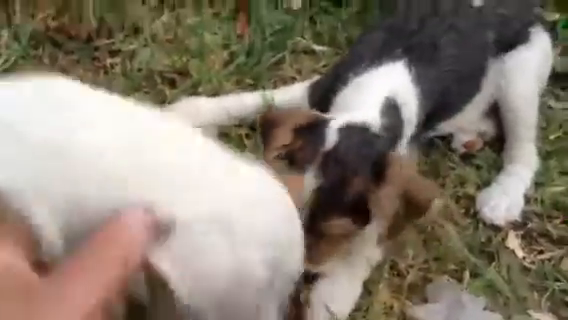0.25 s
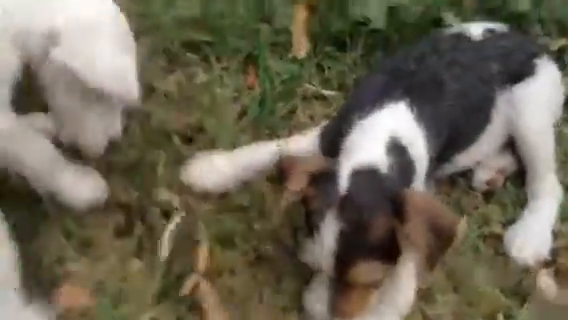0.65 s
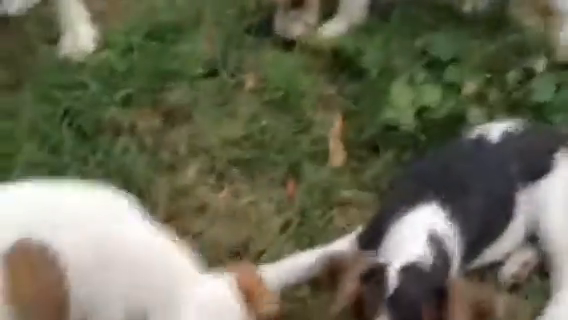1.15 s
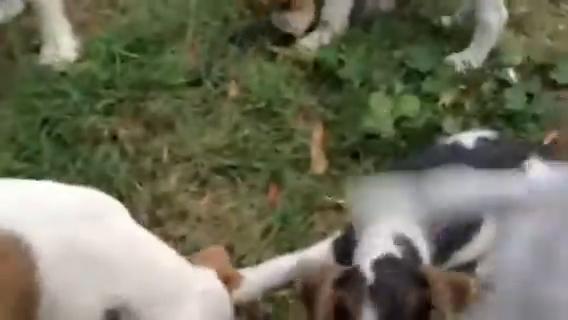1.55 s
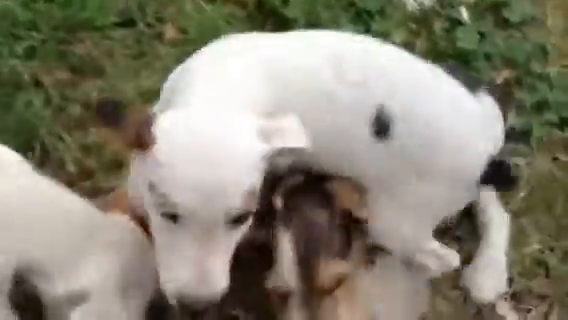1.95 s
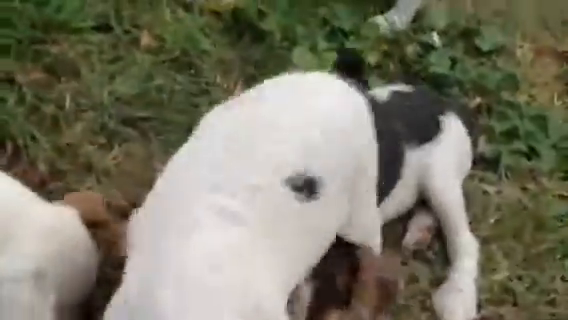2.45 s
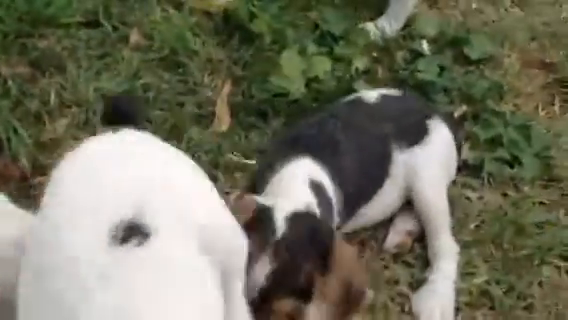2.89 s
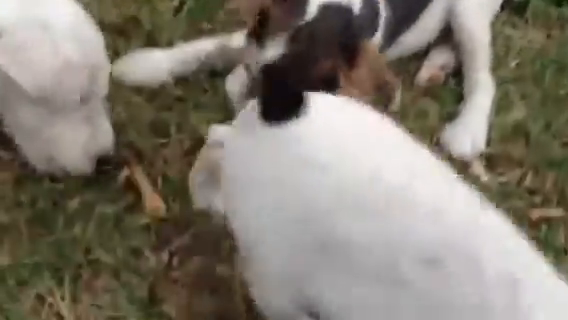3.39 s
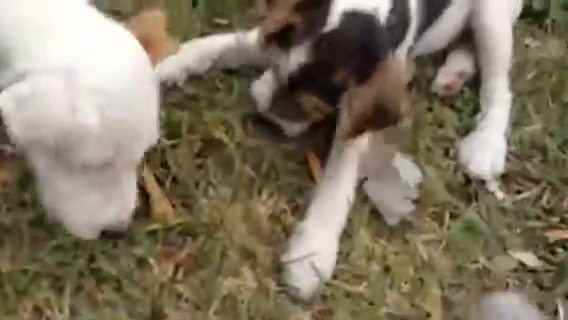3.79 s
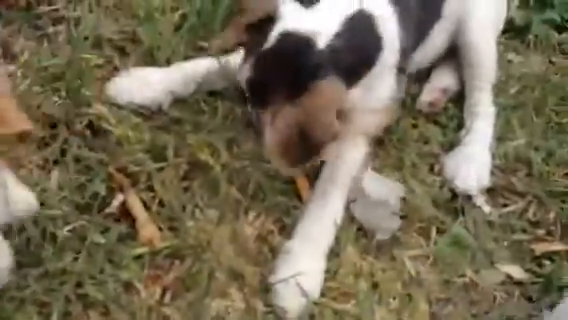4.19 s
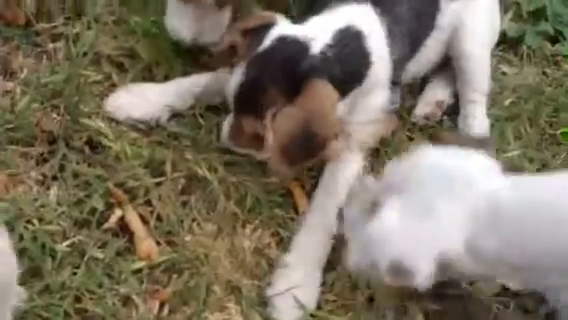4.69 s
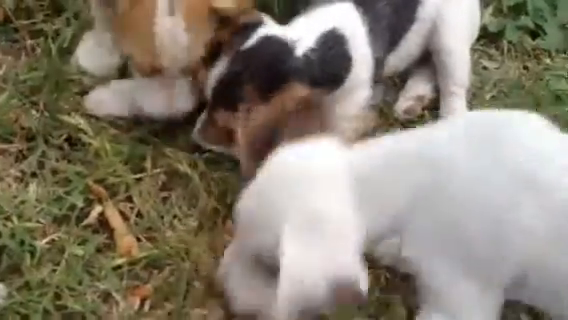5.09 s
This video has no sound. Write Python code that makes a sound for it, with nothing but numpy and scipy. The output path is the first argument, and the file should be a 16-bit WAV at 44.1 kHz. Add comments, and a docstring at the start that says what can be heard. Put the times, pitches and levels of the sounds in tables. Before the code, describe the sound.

In a quiet garden, puppies stir the grass close by, making light crackles, short sniffs and wet mouth smacks. A loud, brittle snap cuts in after about a second, and the other sounds duck and swell back. Scattered clicks of dry stalks and chewing follow, then a brief, faint whine. Thin bird chirps and a low, distant hum stay far behind.

```python
"""Puppies on a lawn

Puppies chew, snuffle, smack and whimper close by, while the grass under them rustles in countless
tiny impacts. Something hard scrapes under strain and snaps in a quick run of cracks, which drives the
gain control down, so that everything ducks and swells back. Small birds whistle in the garden over a
soft wash of noise, a low hum and the firing tone of a far-off engine."""
import sys
import numpy as np
from scipy import signal
from scipy.fft import rfft, irfft
from scipy.io import wavfile
from scipy.ndimage import uniform_filter1d, minimum_filter1d

SR = 44100
rng = np.random.default_rng(int(sys.argv[2]) if len(sys.argv) > 2 else 0)


def persist_wave(psi):
    """Save psi, clipped to +-1, as 16-bit WAV."""
    counts = np.round(np.clip(psi, -1, 1) * 32767).astype(np.int16)
    wavfile.write(sys.argv[1], SR, np.atleast_2d(counts).T)


N = 235690
T = np.arange(N) / SR

# how much the puppies stir the grass: (time [s], relative level [dB])
GRASS_STIR = [(0, -59.5), (.58, -53), (.85, -60.5), (1.75, -56.5), (2.25, -64.5), (2.98, -68), (3.28, -57),
              (3.6, -61), (3.88, -57), (4.96, -60), (5.11, -64), (5.19, -56), (5.34, -62.5)]
# spectrum of blades in contact: (frequency [Hz], level [dB])
GRASS_SPECTRUM = [(500, -27), (1000, -4.5), (1600, -6), (2200, -5), (4000, -1.5), (5600, -3), (7500, -0.5),
                  (11600, -1), (14500, -1), (15500, -7)]
# the snap, crack by crack: (time [s], peak [dB], splinter decay time [s], body re crack [dB])
SNAP_CRACKS = [(0.9426, -13.5, 0.00046, -2), (0.9762, -7.5, 0.0016, -15), (0.9828, -4, 0.00085, -7.5),
               (0.99, 9.5, 0.0004, -17), (0.9933, 0, .0007, -4.5), (1.0031, 6, 0.00077, -9),
               (1.0114, 1, 0.0016, 11), (1.016, 8.5, 0.0015, 0), (1.018, 8, 0.0004, -0.5)]
# spectrum of the breaking material: (frequency [Hz], level [dB])
SNAP_SPECTRUM = [(240, -46), (400, -16.5), (821, -10), (900, -16), (1240, -7), (2090, -12.5), (2320, -6),
                 (3570, -6.5), (4920, -3), (6280, -2), (8280, 0.5), (13500, -6), (15500, -10)]


def undb(db):
    """Amplitude ratio of a level in decibels."""
    return 10 ** (np.asarray(db) / 20)


def unit(x):
    """Normalisation to rms 1."""
    return x / np.sqrt(np.mean(x ** 2))


def curves(rows):
    """Linear interpolation of each column of a table over time."""
    times, *columns = np.transpose(rows)
    return [np.interp(T, times, column) for column in columns]


def drift(rate):
    """Random modulation: `rate` Gaussian values a second, joined by lines; spread near 1."""
    knots = np.arange(int(N / SR * rate) + 2) / rate
    return 1.2 * np.interp(T, knots, rng.standard_normal(len(knots)))


def swell(middle, length):
    """Super-Gaussian envelope: a flat-topped rise and fall around a moment."""
    return np.exp(-np.minimum(np.abs(2 * (T - middle) / length) ** 4, 50))


def phase(hz):
    """Phase in radians is the time integral of angular frequency."""
    return 2 * np.pi * np.cumsum(hz) / SR


def response(spectrum, size=2048):
    """Minimum-phase impulse response of unit energy, from the folded cepstrum of a spectrum."""
    hz, db = np.transpose(spectrum)
    bin_hz = np.arange(size // 2 + 1) * SR / size
    gain = undb(np.interp(np.log(bin_hz + 1), np.log(hz), db))
    cepstrum = irfft(np.log(gain))
    cepstrum[1:size // 2] *= 2
    cepstrum[size // 2 + 1:] = 0
    h = irfft(np.exp(rfft(cepstrum)))
    return h / np.sqrt(np.sum(h ** 2))


def through(x, h):
    """Linear filtering: convolution with the impulse response h."""
    return signal.fftconvolve(x, h)[:N]


def resonate(x, hz, width_hz):
    """Second-order resonance, gain 1 at its centre."""
    return signal.lfilter(*signal.iirpeak(hz, hz / width_hz, fs=SR), x)


def ring(hz, t60):
    """Free vibration of a damped mode, falling 60 dB in t60 seconds."""
    t = T[:SR // 4]
    return np.cos(2 * np.pi * hz * t) * np.exp(-np.log(1000) * t / t60)


def add(out, s, sound):
    """Superposition of a sound that starts at s seconds."""
    start = int(s * SR)
    out[start:start + len(sound)] += sound[:N - start]


def with_delayed_copy(x, delay_s, db):
    """Comb filtering: a sound plus a delayed, weaker copy of itself."""
    return x + undb(db) * np.interp(T - delay_s, T, x, left=0)


def grains(rate, spread_db):
    """Shot noise: `rate` random impacts a second, most small and a few large; rms 1."""
    sizes = undb(spread_db * np.minimum(rng.exponential(size=N), 5))
    return unit((rng.random(N) < rate / SR) * sizes * rng.choice([-1, 1], N))


def fracture(h, decay_s, splinter):
    """Brittle fracture: an impulse and a decaying spray of splinters excite the response h; peak 1."""
    force = splinter * rng.standard_normal(len(h)) * np.exp(-T[:len(h)] / decay_s)
    force[0] = 1
    crack = signal.fftconvolve(force, h)
    return crack / np.abs(crack).max()


def garden(hum_hz=120):
    """Ambient noise: a far-off broadband wash and a low hum, each gently amplitude-modulated."""
    # course of the background: (time [s], wash level [dB], hum level [dB])
    levels = [(0, -57, -63.5), (1.0, -57, -66), (1.8, -56, -79), (3.3, -58, -75.5), (3.8, -60, -78),
              (4.4, -58.5, -78), (5.34, -58, -79)]
    # spectrum of the wash: (frequency [Hz], level [dB])
    wash_spectrum = [(25, -20), (50, -15.5), (80, -7.5), (110, -4), (145, 3), (185, 2.5), (300, -3),
                     (450, -7.5), (750, -3), (1200, -3.5), (2000, -12), (2700, -19), (4500, -19),
                     (7000, -27.5), (15500, -29.5)]
    wash_db, hum_db = curves(levels)
    wash = through(rng.standard_normal(N), response(wash_spectrum, size=8192))
    hum = np.sqrt(2) * np.sin(phase(hum_hz + 0.58 * drift(11)))
    return undb(wash_db + 1.14 * drift(8)) * wash + undb(hum_db + 2.6 * drift(4.8)) * hum


def far_engine():
    """Periodic firing makes a tone; only its unsteady fundamental carries from a distant engine."""
    # the engine gathers speed, then eases off: (time [s], firing frequency [Hz], level [dB])
    firing = [(2.5, 95, -100), (3.1, 96, -78), (4.1, 102, -71), (4.65, 103.3, -70), (5.0, 85, -75),
              (5.34, 76, -76)]
    hz, db = curves(firing)
    amplitude = undb(db + 2.6 * drift(11)) * np.sqrt(2)
    return amplitude * np.sin(phase(hz + 1.24 * drift(9.1)))


def far_notes():
    """Short gliding bird notes, clear or burry with the depth of their fast frequency modulation."""
    # (middle [s], length [s], pitch [Hz], glide [Hz/s], level [dB], burr [share of pitch])
    notes = [(0.667, 0.098, 4150, -4000, -56.5, 0.12), (0.715, .025, 3425, -4, -54, 0.055),
             (2.727, 0.036, 3840, 9, -59, 0.087), (2.786, 0.05, 4270, -3000, -57, 0.15),
             (2.819, 0.037, 3440, 1498, -56.5, 0.028), (3.396, .015, 3320, 0, -62, 0.017),
             (4.531, 0.023, 3400, 2, -55.5, 0.11), (4.579, 0.044, 3560, -12000, -61, .08),
             (4.687, 0.027, 4400, 40000, -62, 0.047), (4.706, .022, 3730, -8000, -54.5, 0.056),
             (5.314, 0.025, 3810, -18000, -53.5, 0.03)]
    out, flutter = np.zeros(N), drift(900)
    for s, length, note_hz, glide, db, burr in notes:
        on = np.abs(T - s) < length
        hz = (note_hz + glide * (T[on] - s)) * (1 + burr * flutter[on])
        out[on] += undb(db) * swell(s, length)[on] * np.sin(phase(hz))
    return out


def chirps(rise_power=1.7, sag_s=0.052, fade_db_per_s=181, end_s=0.069):
    """Two-voice song: each side of the syrinx oscillates in a thin whistle that arches in pitch."""
    # the arches: (time of crest [s], level [dB], lead-in [s])
    arches = [(0.186, -53, 0.04), (1.062, -57.5, 0.05), (2.198, -56, .11), (4.04, -57, 0.049)]
    # the two whistles: (start [Hz], top [Hz], end [Hz], relative level [dB], rise [dB/s],
    # loudest after crest [s], burr [share of pitch])
    voices = [(3240, 4090, 3900, .5, 174, 0.0049, 0.0091), (2564, 3720, 3000, 2, 108, 0.022, .026)]
    out = np.zeros(N)
    for start_hz, top_hz, end_hz, voice_db, rise_db_per_s, loudest_s, burr in voices:
        waver = 1 + burr * drift(700)
        for crest_s, db, lead_s in arches:
            t = T - crest_s
            climb_left = np.clip(-t / lead_s, 0, 1) ** rise_power
            sag = 1 - np.exp(-np.clip(t / sag_s, 0, 2) ** 2)
            hz = (top_hz + (start_hz - top_hz) * climb_left + (end_hz - top_hz) * sag) * waver
            slopes_db = np.minimum(rise_db_per_s * (t - loudest_s), fade_db_per_s * (loudest_s - t))
            envelope_db = np.minimum(slopes_db + 3, 0)  # flat top
            gate = np.clip(np.minimum(t + lead_s, end_s - t) / 0.02, 0, 1)
            out += undb(db + voice_db + envelope_db) * gate * np.sin(phase(hz))
    return out


def birds(foliage_t60_s=0.28):
    """Reflection and scattering: a fence returns the chirps, and foliage gives all song a short tail."""
    far = far_notes()
    near = with_delayed_copy(chirps(), delay_s=0.026, db=-7)
    t = T[:SR // 2]
    foliage = rng.standard_normal(len(t)) * np.exp(-np.log(1000) * t / foliage_t60_s)
    foliage /= np.sqrt(np.sum(foliage ** 2))
    # the farther notes arrive mostly as scattered sound
    direct = near + undb(-1.5) * far
    return direct + through(undb(-2) * near + far, foliage)


def whimper():
    """Voicing with jitter and shimmer: a thin, slightly hoarse whine that sags and lifts again."""
    # course of the whine: (time [s], pitch [Hz], level [dB])
    contour = [(4.15, 812, -74), (4.18, 770, -57.5), (4.2, 700, -53.5), (4.225, 794, -54.5),
               (4.25, 865, -71)]
    # harmonics from the fundamental up: (relative level [dB])
    harmonics = [2, -6, -10]
    hz, db = curves(contour)
    fundamental = phase(hz * (1 + 0.006 * drift(600)))
    return undb(db) * sum(undb(harmonic_db + 1.3 * drift(130)) * np.sin(k * fundamental)
                          for k, harmonic_db in enumerate(harmonics, 1))


def snuffles(flare_depth=0.025, flares_per_s=30):
    """Source and filter: puffs of fluttering air excite the cavities of a puppy's damp nose."""
    # the puffs: (middle [s], length [s], level [dB], spectral tilt [dB/octave])
    puffs = [(0.209, 0.049, -47.5, 3), (0.446, 0.047, -43, 3.5), (0.508, 0.05, -51, 5),
             (0.904, 0.044, -46.5, 4.5), (0.923, .012, -44, 5), (0.939, 0.018, -43.5, 4),
             (1.14, 0.016, -47.5, 1.5), (1.167, 0.074, -50, 3), (1.381, 0.048, -50.5, 3.5),
             (1.732, 0.073, -56, 3), (1.899, 0.046, -50.5, 8.5), (2.287, 0.036, -51.5, 8),
             (2.43, 0.023, -59, 3), (3.034, .013, -60, 0.5), (3.055, 0.033, -60.5, 5),
             (4.735, 0.037, -57.5, 3)]
    # nasal resonances: (frequency [Hz], nominal width [Hz], level [dB])
    resonances = [(752, 138, 8), (1296, 155, 2), (1970, 200, -0.5), (2390, 630, -4), (4170, 1900, -15.5)]
    air = grains(rate=3000, spread_db=2.5)
    # twitching nostrils shift all the resonances together
    warped_time = T + np.cumsum(flare_depth * drift(flares_per_s)) / SR
    cavities = []
    for hz, width, db in resonances:
        band = resonate(resonate(air, hz, 1.06 * width), hz, 1.06 * width)
        cavities.append((hz, undb(db) * np.interp(warped_time, T, band)))
    out = np.zeros(N)
    for s, length, db, tilt in puffs:
        puff = sum(undb(tilt * np.log2(hz / 1000)) * band for hz, band in cavities)
        out += undb(db) * swell(s, length) * unit(puff)
    return out


def nose_whistle(rise_hz_per_s=6500):
    """Orifice tone: air squeezed through a nostril whistles unsteadily, rising as the puff goes on."""
    # whistling puffs: (middle [s], length [s], level [dB], pitch [Hz])
    whistles = [(.904, 0.016, -40.5, 2220), (0.923, .014, -40, 1280), (1.143, 0.018, -39.5, 2350),
                (1.725, .008, -47, 2200), (1.744, .02, -51, 2350), (1.896, 0.02, -39, 2180),
                (2.287, 0.014, -48.5, 2600), (2.434, .018, -56, 2596)]
    out, waver = np.zeros(N), 1 + 0.035 * drift(600)
    for s, length, db, middle_hz in whistles:
        hz = (middle_hz + rise_hz_per_s * np.clip(T - s, -length, length)) * waver
        out += undb(db) * swell(s, length) * np.sin(phase(hz))
    return out


def smacks_and_paws(t60_at_1khz_s=0.013, damping_power=0.29):
    """Lips part and paws land, each exciting one damped mode; lower ones build and die more slowly."""
    # wet smacks and soft paw falls: (time [s], frequency [Hz], peak [dB])
    pops = [(.053, 2050, -46.5), (.087, 1805, -45.5), (0.579, 1100, -42.5), (.832, 1760, -38.5),
            (0.858, 135, -41.5), (.882, 1810, -34), (.883, 725, -44), (1.0, 1610, -22.5), (1.693, 234, -38),
            (2.668, 2430, -53), (3.028, 2180, -46), (3.938, 2700, -51), (4.284, 3060, -56)]
    out = np.zeros(N)
    for s, hz, db in pops:
        t60 = t60_at_1khz_s * (1000 / hz) ** damping_power
        tone = ring(hz, t60)
        tone *= 1 - np.exp(-T[:len(tone)] / (0.11 * t60))  # soft onset
        add(out, s, undb(db) * tone / np.abs(tone).max())
    return out


def rustle():
    """Friction: blades slip past each other in dense grains; flattened stems and soil crunch lower."""
    # paws and muzzles brushing the grass: (middle [s], length [s], level [dB], crunch re brush [dB])
    brushes = [(0.222, 0.068, -49.5, -15), (0.33, 0.06, -51.5, -7), (0.549, 0.014, -46.5, -15),
               (0.587, 0.051, -45, 1), (0.924, 0.059, -44.5, -16), (1.177, .03, -47.5, -6),
               (1.318, 0.066, -41.5, -13), (1.328, .012, -50, -17), (1.633, 0.052, -47.5, -14),
               (1.695, 0.007, -45.5, 5), (1.703, 0.038, -45.5, 2), (1.84, 0.079, -53.5, -13),
               (2.137, 0.056, -51.5, -27), (2.478, 0.041, -57, -6), (2.603, 0.045, -56, -17),
               (3.179, 0.035, -50.5, -5), (3.468, 0.035, -52, 5), (3.799, 0.017, -52, -12),
               (3.872, 0.038, -50, -10), (4.521, 0.034, -50.5, -2), (4.561, 0.036, -52, -4),
               (5.005, 0.096, -56, -5), (5.207, 0.018, -52, 0), (5.239, 0.029, -52.5, -18)]
    stir_db, = curves(GRASS_STIR)
    fidget_db = 1.1 * drift(13) + 1.2 * drift(90)
    stirring = undb(stir_db + 1.66 + fidget_db) * grains(rate=4800, spread_db=2)
    slipping = undb(1.5 * drift(220)) * grains(rate=11000, spread_db=3)
    brushing = sum(undb(db) * swell(s, length) for s, length, db, _ in brushes)
    pressing = sum(undb(db + crunch_db) * swell(s, length) for s, length, db, crunch_db in brushes)
    hiss = through(stirring + brushing * slipping, response(GRASS_SPECTRUM))
    crunch = resonate(undb(-7.5) * stirring + pressing * slipping, hz=640, width_hz=810)
    return hiss + crunch


def chewing():
    """Each bite tears a bundle of fine fibres, whose many small fractures merge into a crackle."""
    # teeth going through stems: (middle [s], length [s], level [dB])
    bites = [(0.742, 0.016, -43.5), (2.12, 0.018, -48), (3.124, 0.011, -49), (3.138, 0.007, -46),
             (3.312, 0.0062, -38.5), (3.322, 0.0088, -49), (4.263, 0.0059, -53), (4.997, 0.0052, -40.5),
             (5.007, 0.008, -47.5), (5.204, 0.0095, -38.5), (5.244, 0.0092, -60)]
    # spectrum of tearing fibres: (frequency [Hz], level [dB])
    fibre_spectrum = [(1000, -25), (2500, -9.5), (4500, -5.5), (6500, -6.5), (11500, -1), (14000, -2),
                      (15500, -1.5)]
    biting = sum(undb(db) * swell(s, length) for s, length, db in bites)
    return through(biting * grains(rate=7000, spread_db=3), response(fibre_spectrum))


def stalk_ticks(small_per_s=22, over_stir_db=7, scatter_db=5):
    """Dry stalks break by brittle fracture; each large one has a broad resonance of its own."""
    # large stalks breaking: (time [s], peak [dB], resonance [Hz])
    large_stalks = [(.112, -42, 12000), (.226, -37.5, 10000), (0.579, -29, 3700), (0.584, -24, 4500),
                    (0.597, -24.5, 6400), (.74, -44, 13500), (1.243, -36, 8000), (1.615, -32, 6500),
                    (1.695, -26, 4470), (2.491, -44, 7050), (2.603, -39, 4540), (2.850, -36.5, 10500),
                    (2.907, -42, 4500), (3.168, -45, 4000), (3.182, -36.5, 5000), (3.345, -40, 4500),
                    (3.459, -39, 10840), (3.48, -38, 7000), (3.557, -38, 11000), (3.696, -39, 12000),
                    (3.819, -36, 8470), (3.843, -30, 7500), (3.86, -46, 12000), (3.904, -34, 11000),
                    (3.908, -34, 12500), (3.93, -35, 11800), (4.263, -31.5, 10800), (4.287, -50, 11600),
                    (4.523, -41, 11000), (4.529, -41, 9000), (4.562, -37, 7950), (4.734, -38.5, 6000),
                    (4.983, -38, 9970), (4.991, -32.5, 12030), (4.999, -34, 10980), (5.006, -44, 4950),
                    (5.013, -34.5, 5500), (5.024, -43, 12000), (5.030, -32, 6460), (5.136, -50, 7000),
                    (5.205, -43, 5520), (5.246, -43, 12870)]
    out, blades = np.zeros(N), response(GRASS_SPECTRUM)
    for s, db, hz in large_stalks:
        stalk = resonate(blades, hz, width_hz=8000)
        add(out, s, undb(db) * fracture(stalk, decay_s=0.00076, splinter=0.5))
    # small stalks tick at random, louder the more the grass is stirred
    stir_db, = curves(GRASS_STIR)
    breaks = rng.random(N) < small_per_s / SR
    small_db = stir_db + over_stir_db + scatter_db * rng.standard_normal(N)
    for s, db in zip(T[breaks], small_db[breaks]):
        add(out, s, undb(db) * fracture(blades, decay_s=0.00085, splinter=0.29))
    return out


def strain(peak_s=0.98, rise_db_per_s=625.5, fall_db_per_s=467):
    """Friction under load: something hard scrapes louder as strain grows, and eases as it gives way."""
    t = T - peak_s
    scrape_db = -28 + np.minimum(rise_db_per_s * t, -fall_db_per_s * t)
    unbroken = T < SNAP_CRACKS[-1][0]
    rubbing = unbroken * undb(scrape_db) * grains(rate=12000, spread_db=2)
    # as it splits, a rough squeal slides down
    squeal_s, fall_hz_per_s = 0.013, 440000
    squeal_hz = 8200 - fall_hz_per_s * np.clip(t, -squeal_s, squeal_s)
    squeal = undb(-30) * swell(peak_s, squeal_s) * drift(3000) * np.sin(phase(squeal_hz))
    return through(rubbing, response(SNAP_SPECTRUM)) + squeal


def snap():
    """Impulsive excitation: the hard thing breaks in a run of cracks, each ringing its body's modes."""
    # modes of the body: (frequency [Hz], t60 [s], relative level [dB])
    body_modes = [(194, 0.02, -58), (320, 0.024, -30.5), (1090, 0.008, -23.5), (1500, 0.0028, -24)]
    # faint bright modes rung by the last crack: (frequency [Hz], t60 [s], level [dB])
    bright_modes = [(4872, .21, -68), (5561, .3, -56), (7574, 0.18, -44)]
    out, material = np.zeros(N), response(SNAP_SPECTRUM)
    body = sum(undb(db) * ring(hz, t60) for hz, t60, db in body_modes)
    for s, db, decay_s, body_db in SNAP_CRACKS:
        add(out, s, undb(db) * fracture(material, decay_s, splinter=0.29))
        add(out, s, undb(db + body_db) * body)
    after_ring = sum(undb(db) * ring(hz, t60) for hz, t60, db in bright_modes)
    add(out, SNAP_CRACKS[-1][0], after_ring)
    return out


def gain_control(x, ceiling_db=-2.5, recovery_s=1, window_s=0.00056):
    """Peak limiting: a peak over the ceiling cuts the gain at once, and the cut decays exponentially."""
    window = int(window_s * SR) + 1
    headroom_db = minimum_filter1d(ceiling_db - 20 * np.log10(np.abs(x) + 1e-9), window)
    excess_db = np.maximum(-headroom_db, 0)
    recovery = np.exp(-T / recovery_s)
    cut_db = np.maximum.accumulate(excess_db / recovery) * recovery
    return x * undb(-uniform_filter1d(cut_db, window))


def scene():
    """Superposition of all sources; a faint 2 ms delayed copy slightly colours the grass sounds."""
    grass = with_delayed_copy(rustle() + chewing() + stalk_ticks(), delay_s=0.0021, db=-21)
    close_by = grass + strain() + snap() + snuffles() + nose_whistle() + smacks_and_paws()
    return (close_by + birds() + whimper() + garden() + far_engine())[None]


def record(dry, low_hz=45.6, top_hz=15400):
    """Band limiting: a small microphone loses deep bass; the recorder ducks at peaks and cuts the top."""
    highpass = signal.butter(2, low_hz, "high", fs=SR, output="sos")
    lowpass = signal.ellip(8, 0.2, 70, top_hz, fs=SR, output="sos")
    ducked = gain_control(signal.sosfilt(highpass, dry[0]))
    return signal.sosfilt(lowpass, ducked)[None]


dry = scene()
out = record(dry)
persist_wave(out)
```